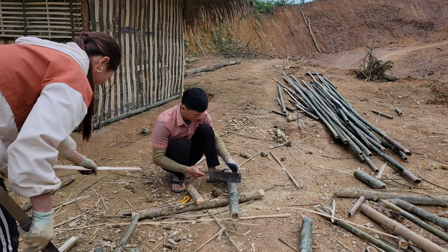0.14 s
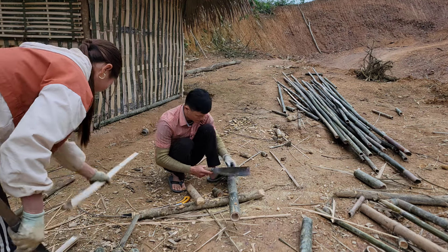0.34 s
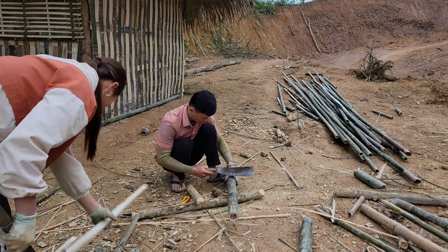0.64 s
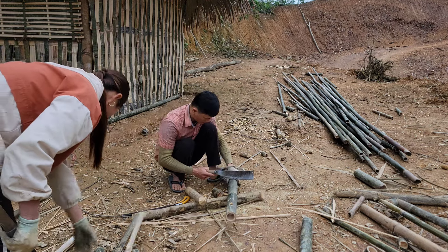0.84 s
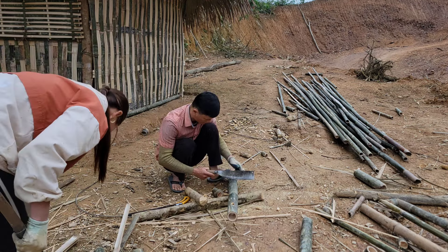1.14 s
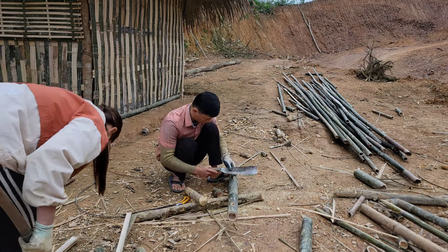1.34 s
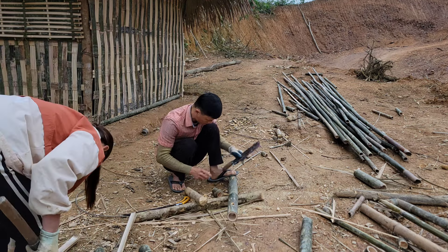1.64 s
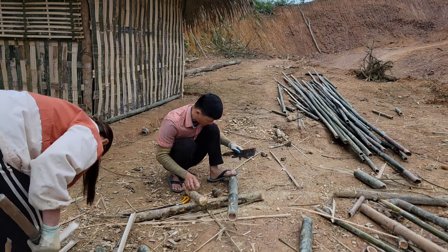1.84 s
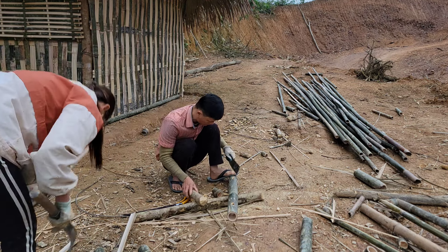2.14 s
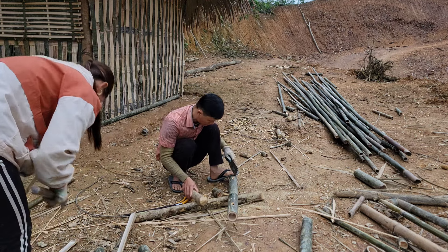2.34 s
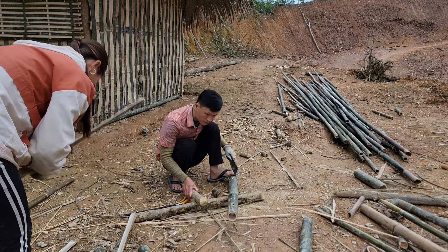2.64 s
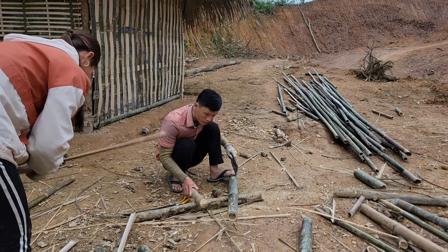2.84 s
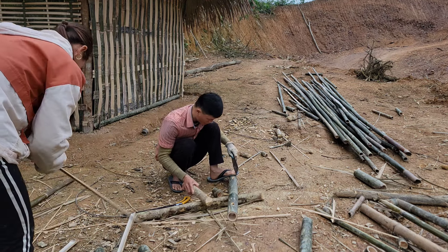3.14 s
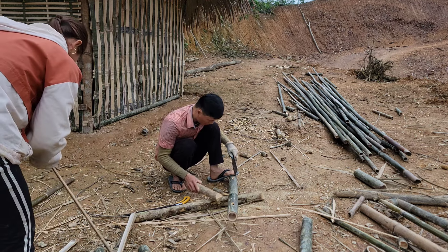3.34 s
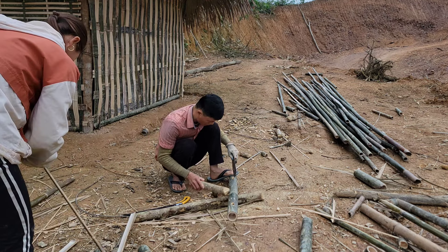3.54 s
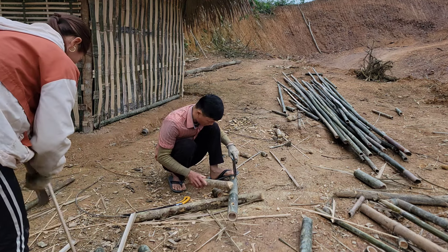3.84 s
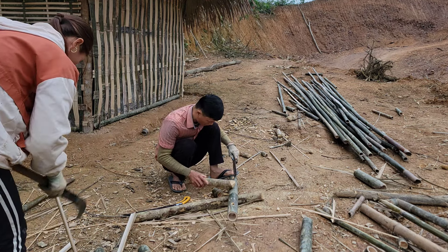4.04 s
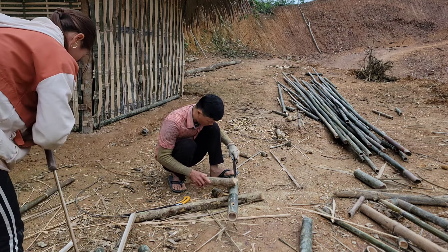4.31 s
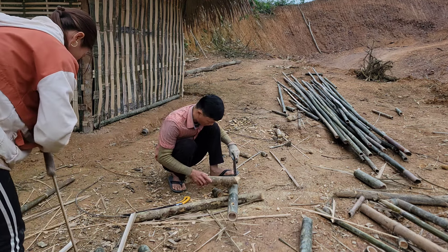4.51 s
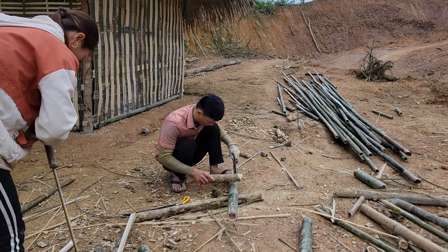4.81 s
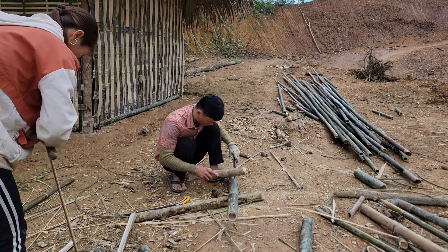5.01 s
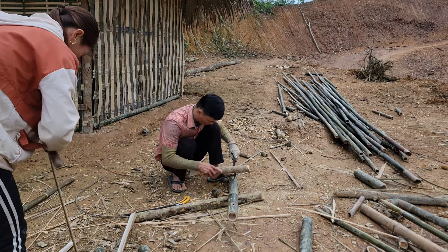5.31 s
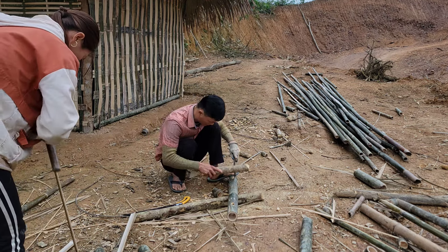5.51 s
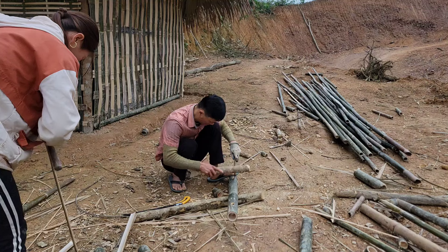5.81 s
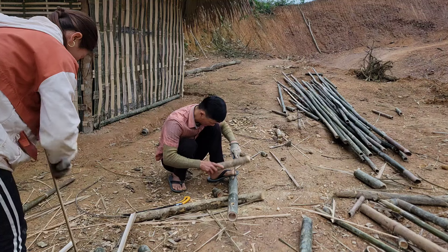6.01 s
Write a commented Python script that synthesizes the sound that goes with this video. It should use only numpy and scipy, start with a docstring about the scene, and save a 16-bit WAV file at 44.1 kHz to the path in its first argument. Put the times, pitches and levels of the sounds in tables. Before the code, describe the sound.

Close stereo outdoors: dry, bright slat clatter comes first, in two bursts with quick fading rebounds and gritty ticks. Several quiet seconds follow with faint rustling, small wooden taps, insects and thin faraway fowl calls. Near the end, a blade jerked along bamboo tears it in sharp, loud cracks about a third of a second apart, interleaved with a club's hollow knocks, echoing lightly off ground and hut.

```python
"""A faint low hum, insects and far-off fowl lie over an earth yard; then two split bamboo slats are tossed down.
They land end by end and bounce to rest: struck modes, dense noise for the clatter, bright ticks on the grit.
A blade is jerked along a cane, which cracks open stroke by stroke: swelling noise, a cane tone and a jolt.
Between and after the last strokes a wooden club knocks a machete into a pole, ringing its wall and its hollow.
Light taps, a thud, soft noise and glove brushes fill the gaps; the yard's echoes surround the blows."""
import sys
import numpy as np
from scipy import signal
from scipy.fft import rfft, irfft, next_fast_len
from scipy.io import wavfile
from scipy.ndimage import uniform_filter1d, map_coordinates

SR = 44100
rng = np.random.default_rng(int(sys.argv[2]) if len(sys.argv) > 2 else 0)


def master(y):
    """Save y as 16-bit WAV."""
    cut = np.clip(np.atleast_2d(y).T, -1, 1)
    pcm = np.round(cut * 32767)  # scale
    wavfile.write(sys.argv[1], SR, pcm.astype(np.int16))


N = 271656
TIME = np.arange(N) / SR  # seconds through the scene
T = np.arange(SR // 2) / SR  # seconds inside one hit

# Dense upper modes of clattering bamboo. Each row: frequency in Hz, relative level in dB.
CLATTER_SPECTRUM = [(100, -31.5), (400, -21.5), (700, -8), (1200, -1), (2000, -3), (3500, 5), (6000, -0.5),
                    (8000, -17), (11000, -17), (15000, -20)]
# Tearing and rubbing fibres. Each row: frequency in Hz, relative level in dB.
FIBRE_SPECTRUM = [(80, -13.5), (250, -8), (500, -2), (1300, -2.5), (2400, -5), (3400, -0.5), (4500, 4.5),
                  (6200, -0.5), (7200, -3), (10000, -7), (14500, -9), (16000, -10.5)]
# Low modes of a dull jolt. Each row: frequency in Hz, relative level in dB, undamped t60 in seconds.
JOLT_MODES = [(88, 1.5, 0.076), (129, -1.5, 0.05), (175, 4, 0.07), (254, -10.5, 0.18), (306, -21, 0.155),
              (392, -10.5, 0.086)]
CONTACT_S = 0.00059  # time constant with which a contact beds in


def amp(db):
    """Decibels to amplitude."""
    return 10 ** (np.asarray(db) / 20)


def unit(x):
    """Scale to rms 1."""
    return x / np.sqrt(np.mean(x ** 2) + 1e-20)


def struck(x):
    """Scale to rms 1 over the first hundredth of a second."""
    return x / np.sqrt(np.mean(x[..., :SR // 100] ** 2) + 1e-20)


def along(points, hz):
    """Read (Hz, value) points on a logarithmic frequency axis."""
    f, v = np.transpose(points)
    return np.interp(np.log(hz + 1), np.log(f), v)


def filtered(x, response):
    """Multiply the spectrum of x by a response of frequency, which may be complex."""
    n = x.shape[-1]
    m = next_fast_len(n + 8192)
    return irfft(rfft(x, m) * response(np.fft.rfftfreq(m, 1 / SR)), m)[..., :n]


def low_cut(x, hz):
    """A thin body radiates little bass."""
    return signal.lfilter(*signal.butter(2, hz, "high", fs=SR), x)


def soften(x, hz):
    """A soft contact leaves out the high modes."""
    return struck(signal.lfilter(*signal.butter(2, min(hz, SR / 2 - SR / 20), fs=SR), x))


def fade(t60):
    """Decay by 60 dB in t60 seconds."""
    return np.exp(-np.log(1000) * T / t60)


def onset(seconds):
    """Exponential approach to full strength with this time constant."""
    return 1 - np.exp(-T / seconds)


def wobble(rate):
    """A smooth random curve, rate knots a second."""
    return map_coordinates(rng.standard_normal(int(N * rate / SR) + 4), [TIME * rate])


def noise(spectrum, shape):
    """Coloured noise of rms 1."""
    return unit(filtered(rng.standard_normal(shape), lambda hz: amp(along(spectrum, hz))))


def ring(modes, scatter_db):
    """Modes whose strength and sign depend on the point that is struck."""
    hz, db, t60 = np.transpose(modes)
    size = amp(db + scatter_db * rng.standard_normal(len(hz))) * rng.choice([-1, 1], len(hz))
    partials = np.sin(2 * np.pi * hz[:, None] * T) * fade(t60[:, None])
    return struck(size @ partials)


def close_pair(shared, own, apart):
    """Two close microphones hear the same bass; their treble differs."""
    return shared + apart * filtered(own, lambda hz: hz / np.hypot(hz, 1500))


def spread(spectrum, apart, ripple_db):
    """Stereo noise for one hit, with resonant humps of its own."""
    humps = rng.standard_normal(SR // 100)  # one knot every 130 Hz
    ripple = lambda hz: amp(ripple_db * map_coordinates(humps, [hz / 130]))
    z = filtered(noise(spectrum, (3, len(T))), ripple)
    return unit(close_pair(z[0], z[1:], apart))


def placed(x, lead_ms, right_db):
    """The left microphone hears the source earlier; the right one picks up a little more bass."""
    side = np.array([[-1], [1]]) / 2
    gain = lambda hz: amp(side * right_db / (1 + (hz / 900) ** 2))
    delay = lambda hz: np.exp(-2j * np.pi * hz * side * lead_ms / 1000)
    return filtered(x, lambda hz: gain(hz) * delay(hz))


def add(track, s, x):
    """Mix x into the track at time s."""
    part = track[..., round(s * SR):][..., :x.shape[-1]]
    part += x[..., :part.shape[-1]]


def background():
    """A low distant hum, soft moving air and a band of insects: coloured noises with wandering levels."""
    # Distant hum. Each row: frequency in Hz, relative level in dB.
    hum_spectrum = [(30, -19), (65, -14.5), (100, -7.5), (135, 0.5), (170, -7.5), (230, -30), (400, -47.5),
                    (800, -88)]
    # Moving air. Each row: frequency in Hz, relative level in dB.
    air_spectrum = [(25, 0.5), (200, 3), (700, -1), (1200, 0), (2000, -8), (3000, -8), (8000, -10),
                    (11000, -31), (16000, -26.5)]
    # Insect chorus. Each row: frequency in Hz, relative level in dB.
    insect_spectrum = [(2500, -51), (3600, -17), (4000, 0.5), (4220, 4.5), (4650, -11), (5300, -3.5),
                       (6400, -17.5), (6900, -30.5), (7400, -18.5), (8200, -30.5), (12000, -48.5)]
    hum_pair = noise(hum_spectrum, N) + 0.26 * noise(hum_spectrum, (2, N))  # mostly common to both sides
    hum = amp(-72.5 + 1.1 * wobble(5.4)) * placed(hum_pair, lead_ms=.25, right_db=3.0)
    air = amp(-75.0 + 0.87 * wobble(1.8)) * noise(air_spectrum, (2, N))
    chorus_db = np.interp(TIME, [0, 2.2, 6.1], [-75, -71.5, -72])
    insects = amp(chorus_db + 2.9 * wobble(20)) * noise(insect_spectrum, (2, N))
    return hum + air + insects


def fowl():
    """Thin arching calls, far away, swelling and fluttering in the moving air."""
    # Each row: start in seconds, length in seconds, pitch in Hz,
    # glide from start to end as a share of the pitch, level in dB before a common lift.
    calls = [(0.116, 0.64, 765, 0, -89), (3.303, 0.45, 1235, .03, -76.5), (4.153, 0.11, 1680, 0.14, -75),
             (4.2, .13, 1185, 0.019, -73.5), (5.04, 0.12, 1175, -0.083, -75.5),
             (5.36, 0.26, 1215, 0, -70.5), (5.526, 0.092, 1775, -.03, -77),
             (5.674, 0.184, 1614, 0.099, -75), (5.781, 0.094, 1180, 0, -64.5)]
    lift_db, arch = 4.5, 0.0364  # both ends dip by the arch, a share of the pitch
    out = np.zeros((2, N))
    for s, length, pitch_hz, glide, db in calls:
        u = np.linspace(0, 1, int(length * SR))
        waver = 1 + .012 * wobble(170)[:len(u)]
        hz = pitch_hz * (1 + glide * (u - .5) - arch * (2 * u - 1) ** 2) * waver
        voice = np.sin(2 * np.pi * np.cumsum(hz) / SR)
        add(out, s, amp(db + lift_db) * np.sin(np.pi * u) * voice)
    return out * amp(3 * wobble(45))


def soft_noise_and_brushes():
    """Soft broadband noise slowly rises and falls in grains; now and then a glove brushes along the cane."""
    # Slow level of soft broadband noise, with the slats' diffuse tail in it.
    # Each row: time in seconds, level in dB before a common lift.
    slow_level = [(0.0, -80), (0.56, -86.5), (0.81, -73), (1.53, -79), (1.85, -86), (4.37, -95),
                  (4.67, -82), (5.18, -76), (6.16, -61.5)]
    # Single brushes of the glove. Each row: peak in seconds, level in dB.
    brushes = [(.66, -73), (2.18, -68.5), (2.88, -73.5), (3.56, -85), (3.72, -71.5), (4.78, -70.5),
               (5.08, -63.5), (5.42, -59)]
    lift_db, rise_s, fall_s = 4.5, 0.1, 0.036  # the lift is for the slow level, the time constants for brushes
    size = amp(np.interp(TIME, *np.transpose(slow_level)) + lift_db)
    for s, db in brushes:
        away = np.maximum((s - TIME) / rise_s, (TIME - s) / fall_s)
        size = np.hypot(size, amp(db) * np.exp(-away))
    grain_db = 2 * wobble(25) + 3 * wobble(400)
    return size * amp(grain_db) * noise(FIBRE_SPECTRUM, (2, N))


def thud():
    """One dull jolt of low modes that the earth damps at once."""
    start_s, level_db, earth_t60 = 3.887, -51, .05
    out = np.zeros((2, N))
    add(out, start_s, amp(level_db) * struck(ring(JOLT_MODES, scatter_db=0.7) * fade(earth_t60)))
    return low_cut(out, hz=90.7)


def taps():
    """Wood touches a cane lightly: a short dry tick over a small hollow knock."""
    # Each row: start in seconds, level in dB, contact hardness as cut-off in Hz.
    touches = [(2.9946, -47, 2650), (4.3867, -46, 2900)]
    # Wall of the tapped cane. Each row: frequency in Hz, relative level in dB, t60 in seconds before damping.
    cane_modes = [(510, -6, 0.23), (1208, -0.5, 0.14), (1764, -13.5, 0.15), (2330, 2, 0.051),
                  (2570, 4.5, 0.13), (3957, -7, 0.12), (4260, -2, 0.056)]
    out = np.zeros((2, N))
    for s, db, hard_hz in touches:
        dense = spread(CLATTER_SPECTRUM, apart=.8, ripple_db=3) * fade(.05) * onset(CONTACT_S)
        wall = ring(cane_modes, scatter_db=1.5) * fade(.09)
        hollow = np.sin(2 * np.pi * 508 * T) * fade(.035)  # the air inside the cane
        add(out, s, amp(db) * (soften(wall + amp(4.5) * dense, hard_hz) + hollow))
    return out


def club():
    """The club drives the blade in: fibres crunch, the pole's wall rings and its hollow booms."""
    # Each row: start in seconds, level in dB, contact hardness as cut-off in Hz, boom in dB, crunch in dB.
    blows = [(5.5808, -34.5, 1220, -33, -35.5), (5.8573, -20.5, 4070, -35.5, -21.5),
             (6.1249, -24.5, 2040, -36.5, -39.5)]
    # Pole with the blade in it. Each row: frequency in Hz, relative level in dB, t60 in seconds before damping.
    pole_modes = [(519, -1.5, 0.029), (694, -0.5, 0.047), (814, 0.5, 0.035), (1058, 7.5, 0.024),
                  (1250, -13.5, 0.099), (1650, -21, 0.098), (1976, 0, 0.037), (2470, -11, 0.024),
                  (2557, -22, 0.052), (3010, -18, 0.15), (4210, 0, 0.038), (4400, -13, 0.034),
                  (4540, 0, 0.03), (5940, 7, 0.017)]
    # Air inside the pole. Each row: frequency in Hz, relative level in dB, t60 in seconds.
    hollow_modes = [(138, -3, 0.105), (233, 2.5, 0.047), (366.5, -1, 0.14), (517, 4, 0.08)]
    # Bite of the blade. Each row: frequency in Hz, relative level in dB.
    bite_spectrum = [(100, -27.5), (350, -2), (900, -4), (2000, 14.5), (3500, 1.5), (4800, 6.5), (7000, -6),
                     (11000, 6), (15000, -22)]
    grip_t60 = 0.21  # a foot on the pole damps its wall
    out = np.zeros((2, N))
    entering = onset(.0015)
    for s, db, hard_hz, boom_db, crunch_db in blows:
        bite = spread(bite_spectrum, apart=1.0, ripple_db=6.5) * fade(0.047) * entering
        wall = ring(pole_modes, scatter_db=4.5) * fade(grip_t60)
        knock = soften(wall + amp(7) * bite, hard_hz)
        boom = ring(hollow_modes, scatter_db=0.0)
        crunch = struck(spread(FIBRE_SPECTRUM, apart=0.98, ripple_db=3.0) * fade(0.023) * entering)
        add(out, s, amp(db) * knock + amp(boom_db) * boom)
        add(out, s + .001, amp(crunch_db) * crunch)
    return low_cut(out, hz=105)


def rebounds(landing, count):
    """After a hard landing each flight is shorter, each return weaker and softer."""
    flight_s, flight_kept, loss_db, hardness_kept = .1095, .697, 5.5, 0.53
    slap_s, slap_db = .0125, -5
    s, db, hard_hz = landing[:3]
    k = np.arange(count) + 1
    times = s + np.cumsum(flight_s * flight_kept ** (k - 1))
    return [(t, db - loss_db * n, hard_hz * hardness_kept ** n, slap_s, slap_db)
            for t, n in zip(times, k)]


def contacts_of(landings):
    """One end lands, the far end slaps down softer, and the first end chatters after the same gap."""
    slap_hardness, chatter_db = 0.67, -12
    contacts = []
    for s, db, hard_hz, gap, slap_db in landings:
        for k, step_db in enumerate([0, slap_db, chatter_db]):
            contacts.append((s + k * gap, db + step_db, hard_hz * slap_hardness ** (k * k)))
    return contacts


def slat(contacts, modes, clatter_t60, snap_db, tick_db, low_hz):
    """Each contact rings the slat's main modes and a crowd of short-lived ones; the ground detunes them."""
    # Hard edge meeting grit. Each row: frequency in Hz, relative level in dB.
    tick_spectrum = [(1500, -23.5), (4000, -5), (6000, 1), (8000, -2), (11000, -5.5), (15000, -13.5)]
    out = np.zeros((2, N))
    bedding = onset(CONTACT_S)
    for s, db, hard_hz in contacts:
        decay = amp(4) * fade(clatter_t60) + amp(snap_db) * fade(.012)
        dense = spread(CLATTER_SPECTRUM, apart=.7, ripple_db=4) * decay * bedding
        detuned = np.array(modes) * [1 + .013 * rng.standard_normal(), 1, 1]
        body = soften(low_cut(ring(detuned, scatter_db=3.5) + dense, hz=low_hz), hard_hz)
        # the harder the contact, the stronger its bright tick
        tick_size = amp(tick_db) / (1 + (5000 / hard_hz) ** 2)
        tick = struck(spread(tick_spectrum, apart=0.48, ripple_db=3.5) * fade(0.015) * bedding)
        add(out, s, amp(db) * (body + tick_size * tick))
    return low_cut(out, hz=90.94)


def first_slat():
    """The first tossed slat rings at each of its listed landings."""
    # Each row: landing in seconds, level in dB, contact hardness as cut-off in Hz,
    # seconds until the far end slaps down, slap in dB over the landing.
    drop = [(.8395, -45.5, 6000, .008, 0), (.8893, -26.5, 1086, .0087, -6),
            (.9115, -23.5, 6000, 0.0055, -7.5), (.9272, -19, 5431, .0068, -5.5)]
    # Modes of the slat. Each row: nominal frequency in Hz, relative level in dB, t60 in seconds.
    modes = [(285, -12, .2), (545, -19, .3), (590, -19, .28), (636, -15, .28), (790, -14, .2),
             (700, -1, .07), (1082, 4, .08), (1200, 4, .07), (1480, -6, .09), (1630, -7, .06),
             (1780, -5, .09), (2370, -3, .08), (2870, -2, .07), (3215, 1, .08), (3530, -1, .07),
             (3810, 0, .07), (4170, -2, .07), (4820, -2, .07)]
    return slat(contacts_of(drop), modes, clatter_t60=.08, snap_db=12.5, tick_db=-6.5, low_hz=700)


def second_slat():
    """The second tossed slat also rebounds three times from its hardest landing."""
    # Each row: landing in seconds, level in dB, contact hardness as cut-off in Hz,
    # seconds until the far end slaps down, slap in dB over the landing.
    drop = [(1.169, -57, 795, 0.011, 0.5), (1.246, -35.5, 2120, 0.0055, 0), (1.267, -20, 9950, 0.0049, -5),
            (1.3005, -29.5, 4100, 0.02, -16), (1.5845, -47, 1170, .0095, 0.5),
            (1.644, -52, 1000, 0.022, -22)]
    # Modes of the slat. Each row: nominal frequency in Hz, relative level in dB, t60 in seconds.
    modes = [(243, -26, .3), (320, -24, .15), (605, -18, .17), (675, -15, .13), (965, -8, .11),
             (1130, -3, .14), (1350, -9, .11), (1500, -6, .17), (1580, -7, .14), (1790, -8, .14),
             (1925, -7, .14), (2160, -8, .12), (2620, -1, .11), (2900, -5, .1), (3195, 2, .1),
             (3785, 0, .09), (4520, -3, .08), (4830, -5, .08), (5400, -2, .05), (5780, -1, .06),
             (6240, -3, .05)]
    hardest = max(drop, key=lambda landing: landing[1])
    contacts = contacts_of(drop + rebounds(hardest, count=3))
    return slat(contacts, modes, clatter_t60=0.07, snap_db=8.5, tick_db=-10.0, low_hz=240.5)


def splitting():
    """Fibre noise swells faster and faster until the cane gives way; it rings briefly and the hand jolts."""
    # Each row: peak in seconds, crack in dB, rise in dB per ms, shelf under 3 kHz in dB,
    # jolt of blade, hand and cane in dB, cane pitch in Hz, cane ring in dB.
    strokes = [(2.128, -44, 2.5, -8, -85.5, 3480, -52), (4.556, -33, 0.57, -2, -58.5, 1130, -72.5),
               (4.9255, -25, 2.5, 8.5, -36, 985, -33.5), (5.2872, -17.5, 3.5, 2.5, -30.5, 1184, -20),
               (5.647, -23, 3, 1.5, -31.5, 1704, -29.5), (6.0036, -15.5, 4.5, -2, -30.5, 1725, -28)]
    # a harder stroke tears through sooner: its decay halves every so many dB
    tear_t60, reference_db, halves_db = 0.027, -18.5, 13.5
    out = np.zeros((2, N))
    lead = SR // 10  # samples of swell before the peak
    ms_before = np.arange(lead, 0, -1) * 1000 / SR
    for s, db, rise, shelf_db, jolt_db, cane_hz, cane_db in strokes:
        t60 = tear_t60 * 2 ** ((reference_db - db) / halves_db)
        swell = np.concatenate([amp(-rise * ms_before), fade(t60)[:-lead]])
        grain = unit(uniform_filter1d(rng.standard_normal(len(T)), size=24))
        snaps = unit(amp(2.2 * grain))
        shelf = lambda hz: amp(shelf_db / (1 + (hz / 3000) ** 4))
        tear = filtered(spread(FIBRE_SPECTRUM, apart=1.0, ripple_db=5.5), shelf)
        add(out, s - lead / SR, amp(db) * swell * snaps * tear)
        cane = np.sin(2 * np.pi * cane_hz * T) * fade(0.041)
        jolt = ring(JOLT_MODES, scatter_db=1.34)
        add(out, s - .0015, amp(cane_db) * cane + amp(jolt_db) * jolt)
    return low_cut(out, hz=82)


def yard(x, near_db, far_db):
    """Ground and hut scatter the sound at once; the slopes and trees return a faint long tail."""
    # Decay of the far tail. Each row: frequency in Hz, t60 in seconds.
    tail_t60 = [(100, .4), (400, 1), (1500, 0.8), (4500, 0.98), (9000, 1), (15000, 0.15)]
    white = rng.standard_normal((2, 3, SR))
    early, late = close_pair(white[:, :1], white[:, 1:], 1.2)
    hz, t, z = signal.stft(late, SR, nperseg=256)
    decay = np.exp(-np.log(1000) * t / along(tail_t60, hz)[:, None])
    far = signal.istft(z * decay, SR, nperseg=256)[1][:, :len(T)]
    far = far * onset(0.067)
    near = early[:, :len(T)] * fade(0.11) * onset(0.0061) ** 2
    echo = amp(near_db) * near / np.linalg.norm(near[0]) + amp(far_db) * far / np.linalg.norm(far[0])
    return x + signal.fftconvolve(x, echo, axes=1)[:, :N]


def scene():
    """The slats and the splitting cane reach the left first; the club is ahead, slightly louder on the right."""
    slats = placed(first_slat() + second_slat(), lead_ms=0.13, right_db=3.0)
    slats = yard(slats, near_db=-16.5, far_db=-30.5)
    knocks = yard(club() * amp([[-1.1], [1.1]]), near_db=-13.0, far_db=-29)
    splits = placed(splitting() + taps() + thud(), lead_ms=0.17, right_db=2.5)
    splits = yard(splits, near_db=-11.5, far_db=-30.0)
    return background() + fowl() + soft_noise_and_brushes() + knocks + slats + splits


def record(dry):
    """A very steep low-pass closes the microphones' band."""
    top_hz = 15900
    return filtered(dry, lambda hz: 1 / (1 + (hz / top_hz) ** 120))


dry = scene()
out = record(dry)
master(out)
```